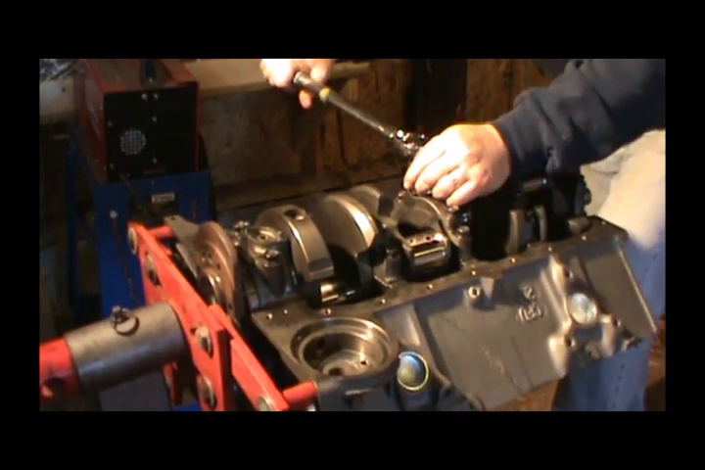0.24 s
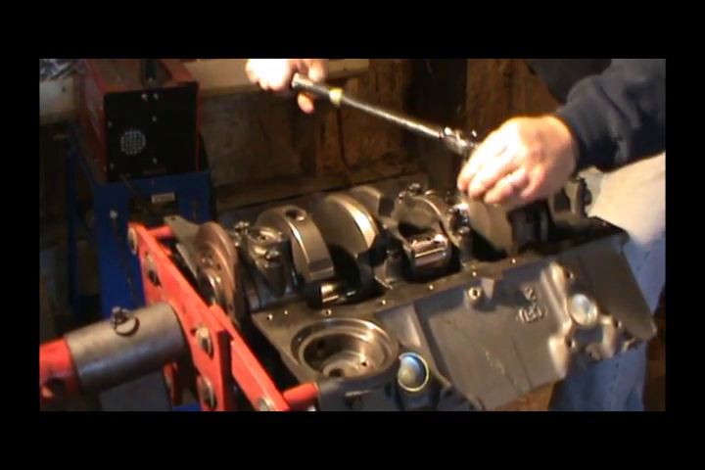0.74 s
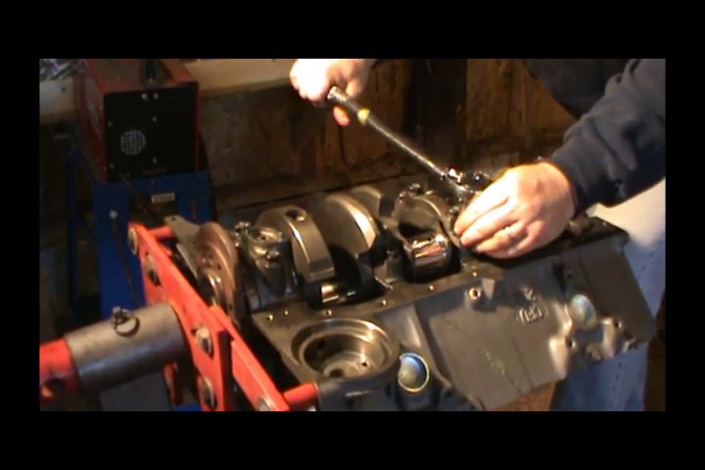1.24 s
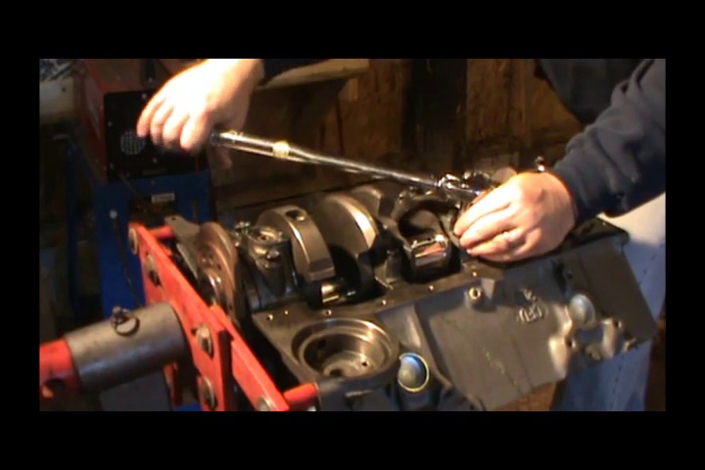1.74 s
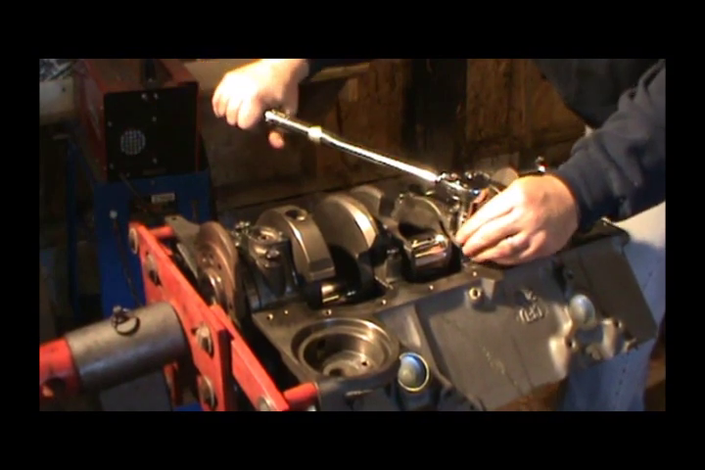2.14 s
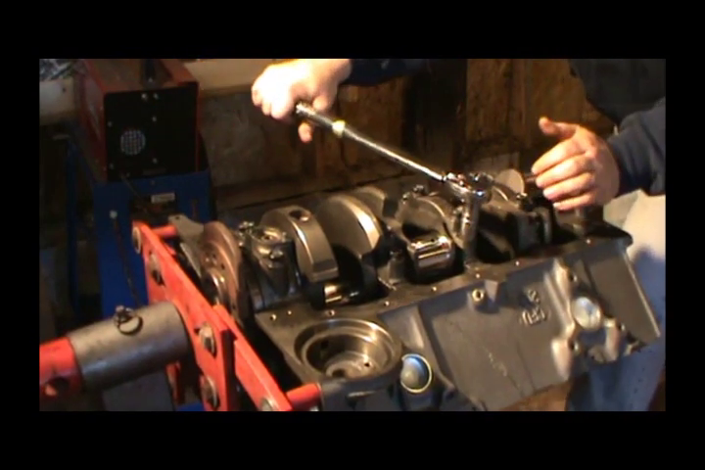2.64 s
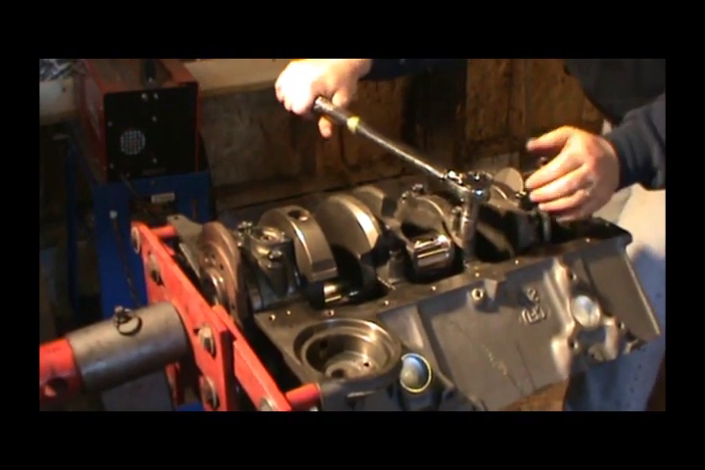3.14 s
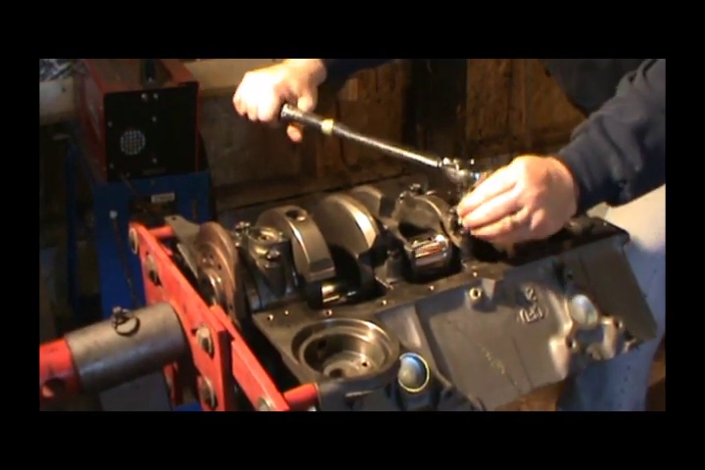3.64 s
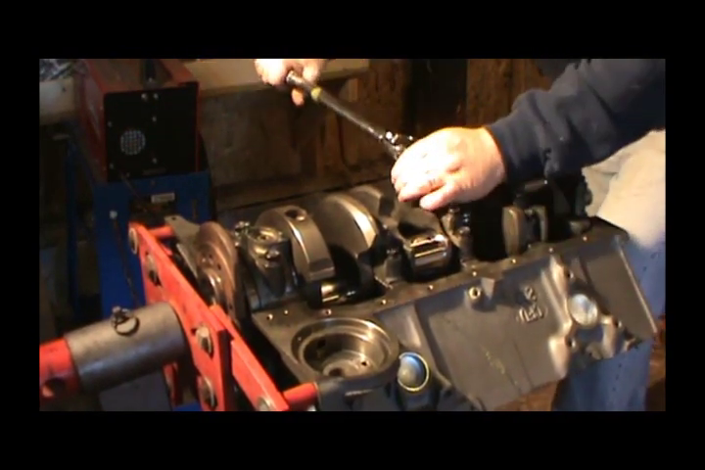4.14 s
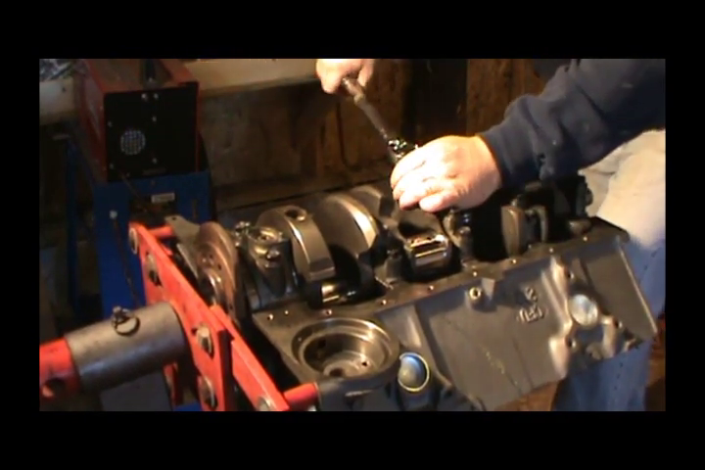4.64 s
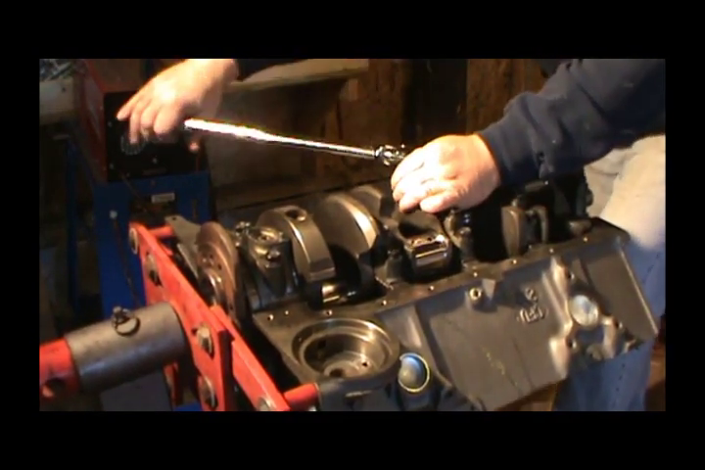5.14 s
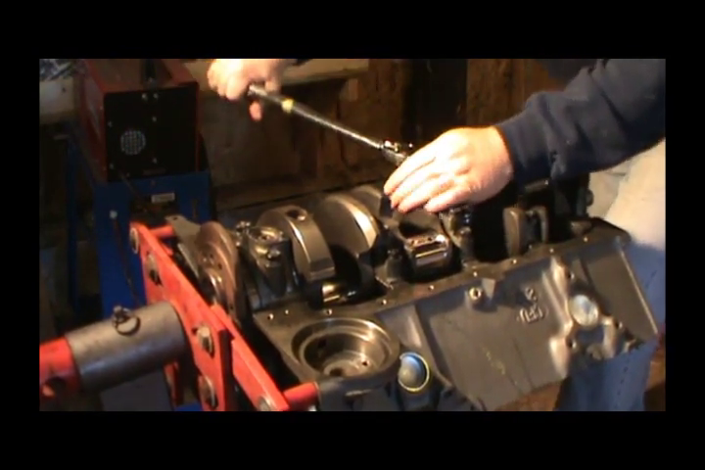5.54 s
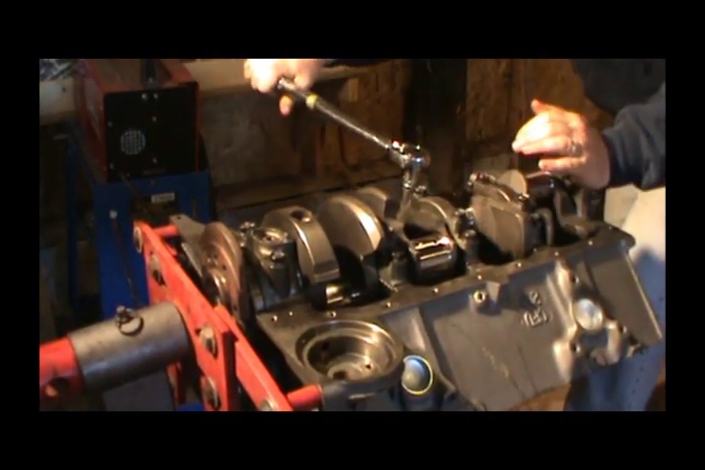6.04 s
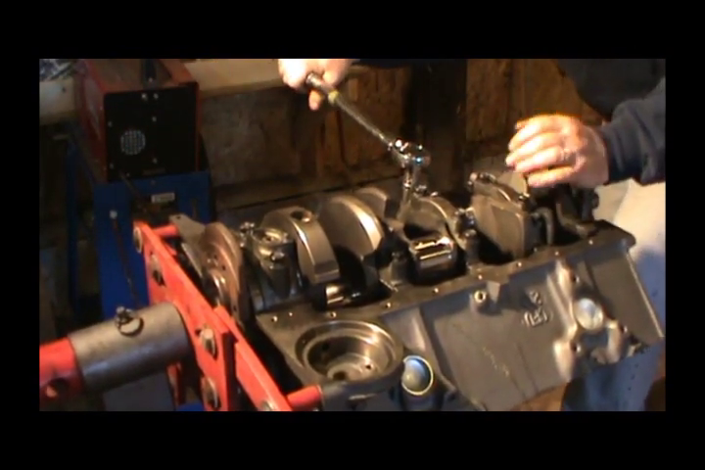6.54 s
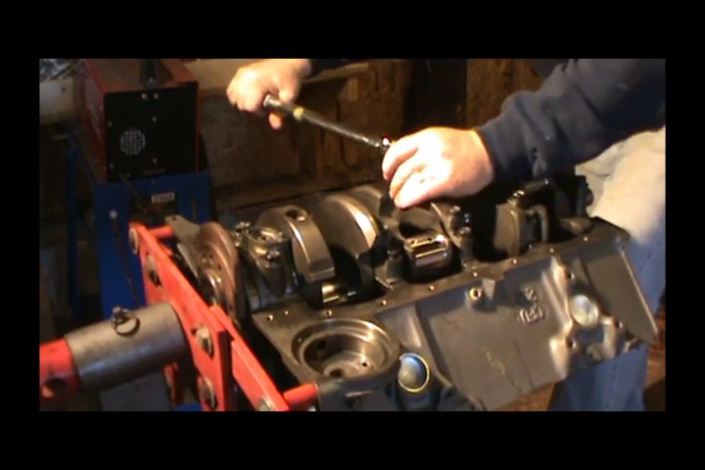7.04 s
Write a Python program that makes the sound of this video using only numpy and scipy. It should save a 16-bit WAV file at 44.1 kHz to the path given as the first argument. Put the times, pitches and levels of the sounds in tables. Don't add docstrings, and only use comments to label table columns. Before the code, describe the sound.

A quiet garage with soft low hush, heard close in stereo. At 0.04 s a loud, bright wrench click rings and echoes for about half a second, over grainy hand rubbing. Small dull bumps lead to a socket clack at 1.05, with rattles until 1.3. Two crisp ratchet ticks come at 1.61 and 1.70, then faint knocks around 2 to 2.5. A heavy torque click breaks at 2.84, strongly echoed, and its bright reset snaps at 3.18. Quiet handling follows; the socket lands hard at 4.17, with rubbing and a double knock near 4.63. Three quick double-edged ratchet ticks fall at 4.95, 5.03 and 5.11. Light bumps and rustle continue until a loud click at 6.32 and ringing reset at 6.63. Small knocks, a scuff and a rattle close near 7.1. Faint lens motor ticking surfaces around 1.1, 2.1, 2.9 and 5.7.

```python
import sys
import numpy as np
from scipy import signal
from scipy.fft import rfft, irfft
from scipy.io import wavfile
from scipy.ndimage import uniform_filter1d

SR = 44100
rng = np.random.default_rng(int(sys.argv[2]) if len(sys.argv) > 2 else 0)


def gain_from_decibels(decibels):
    exponent = np.asarray(decibels, float) / 20
    return 10 ** exponent


def file_out(sig):
    cols = np.atleast_2d(sig).T
    lim = np.clip(cols, -1, 1)
    pcm = np.round(lim * 32767).astype(np.int16)
    wavfile.write(sys.argv[1], SR, pcm)


N = 321048
SPAN = 16384

# frequency in Hz, level in dB.
HUSH_COLOUR = [(12, -49), (20, -7.5), (102, -4.5), (134, -6.5), (173, -7), (211, -9), (390, -9.5),
               (449, -10.5), (488, -11.5), (702, -13), (831, -13), (1130, -16), (1870, -17.5),
               (2550, -18.5), (16200, -29.5)]
HUSH_DB = -55.5
# frequency in Hz, likeness from 0 to 1.
HUSH_LIKENESS = [(60, 1.0), (130, 0.99), (290, 0.899), (640, 0.476), (1410, 0.04), (3100, 0.087),
                 (6820, 0.091), (15000, 0.47)]

# start in seconds, length in seconds, level in dB.
RUB = [
    (0, 0.554, -56.5),
    (1.25, 0.68, -56),
    (2.2, 0.13, -75.5),
    (2.49, 0.047, -56.5),
    (3.4, 0.332, -60.5),
    (4.33, 0.36, -57),
    (5.2, 0.416, -56.5),
    (5.7, 0.78, -65),
    (6.8, 0.11, -94),
    (7.08, 0.014, -50),
]
# frequency in Hz, level in dB per Hz.
RUB_COLOUR = [(300, -33.5), (700, -5.5), (1500, 1), (3000, -1.5), (5000, -7), (9000, -16.5), (15000, -14.5)]

# start in seconds, peak in dB, treble in dB against the peak,
# pan in dB (positive is left). The tables of the other blows of steel have the same columns.
RESETS = [
    (0.0418, -6.5, -13.5, -0.11),
    (3.1777, -5.5, -11, -1.14),
    (6.628, -6, -9.5, -0.021),
]
# frequency in Hz, level in dB per Hz.
RESET_COLOUR = [(100, -37.5), (350, -18), (900, -13), (2350, -3), (2750, -6.5), (3800, 3), (5200, -4.5),
                (5800, 0), (6600, -6), (7500, 2.5), (8600, -11), (10300, -5), (11800, -17.5),
                (15600, -21.5)]
# frequency in Hz, level in dB under the blow, seconds to fall by 60 dB.
RESET_MODES = [(953.5, -26, 0.156), (1381.8, -21.5, 0.189), (2317, -26, 0.433), (4610, -22.5, 0.272),
               (5420, -42.5, 0.18), (5739, -26.5, 0.3), (7400, -17, 0.211), (8043, -28.5, 0.17),
               (15505, -26.5, 0.262)]

# start in seconds, peak in dB, treble in dB against the peak, # body frequency in Hz.
KNOCKS = [(0.502, -45.5, -12.5, 2100), (0.8808, -53, -15.5, 1107), (1.504, -46, -15.5, 1270),
          (1.9323, -37, -13, 1104), (2.0403, -46, -14, 1340), (2.0744, -51.5, -14, 2360),
          (2.4138, -35.5, -33.5, 1750), (2.481, -44.5, -10.5, 2030), (3.8056, -49, -31.5, 2160),
          (3.8226, -50.5, -17, 2420), (3.9698, -51.5, -8.5, 4330), (4.0665, -44, -18.5, 3630),
          (4.6225, -25, -20.5, 3460), (4.6321, -22, -12, 1350), (4.841, -45.5, -22, 1950),
          (5.3622, -43, -19.5, 3870), (5.5384, -51, -19.5, 2940), (5.5996, -41.5, -21.5, 2120),
          (5.659, -42, -23, 2830), (5.7816, -47, -14, 2090), (5.9768, -61, -24, 1920),
          (6.9084, -45.5, -25, 1590), (6.9598, -48, -19, 1960), (7.0965, -36.5, -13.5, 3490),
          (1.1712, -27, -19.5, 3300), (4.6073, -36, -11.5, 3290), (7.083, -36, -24, 3300),
          (5.3351, -37, -21.5, 3280), (5.4694, -42, -14, 3280), (5.5746, -44, -5.5, 3300)]
# frequency in Hz, level in dB per Hz.
KNOCK_COLOUR = [(200, -48.5), (500, -6.5), (1500, -1), (3300, -1.5), (5000, -4.5), (8000, -11),
                (14000, -28.5)]
KNOCK_BODY_DB, KNOCK_BODY_OCTAVES, KNOCK_PAN_DB = 10, 0.25, -4.5

# start in seconds, peak in dB, treble in dB against the peak, pan in dB.
SEATS = [
    (1.0482, -37, -15, -21.5),
    (1.053, -19, -17.5, -4),
    (4.173, -9.5, -14.5, -5.5),
]
# frequency in Hz, level in dB per Hz.
SEAT_COLOUR = [(120, -55), (200, -36), (933, -12), (1140, -18), (1370, -8.5), (1620, -12.5), (1940, -7),
               (2250, -9.5), (3430, -4), (4270, -8), (7140, -11.5), (12800, -18.5), (16000, -37)]
# frequency in Hz, level in dB under the blow, seconds to fall by 60 dB.
SEAT_MODES = [(920, -11, .07), (1373, -8, .21), (15510, -30, .1), (2020, -24, .05), (3350, -28, .08),
              (4600, -26, .08), (5200, -28, .08)]

# start in seconds, length in seconds, tick level in dB.
LENS = [
    (1.1, 0.51, -52),
    (2.13, 0.5, -46.5),
    (2.9, 0.81, -47),
    (5.72, .6, -46),
    (6.6, .7, -72),
]
# frequency in Hz, seconds to fall by 60 dB, level in dB.
LENS_MODES = [(1920, 0.0482, -5), (4744, 0.0194, 1.5)]

# start in seconds, peak in dB, treble in dB against the peak, pan in dB.
RATTLES = [
    (1.1602, -29, -17.5, -6),
    (1.2024, -31.5, -28.5, -4.5),
    (1.2838, -44.5, -22.5, -13),
    (3.5268, -54, -20, -8.5),
    (3.5757, -51, -28, -8.5),
    (3.5927, -47.5, -28.5, -9.5),
    (4.2922, -33.5, -34, -6),
    (5.4554, -47, -17, -16),
    (7.0576, -40.5, -15.5, -11),
]
# frequency in Hz, level in dB per Hz.
RATTLE_COLOUR = [(180, -47), (300, -20), (787, -15.5), (955, -7.5), (2130, -15), (3290, -5), (3870, -8),
                 (7720, -28), (14000, -40.5)]
# frequency in Hz, level in dB under the blow, seconds to fall by 60 dB.
RATTLE_MODES = [(3320, -9, .06), (3370, -13, .05), (7600, -24, .05)]

# start in seconds, peak in dB, treble in dB against the peak, pan in dB.
PAWL = [
    (1.6092, -9.5, -10, -1.2),
    (1.702, -10, -7, 1.03),
    (4.9432, -25.5, -5, 0.0),
    (4.9468, -12, -9.5, -1.25),
    (5.0222, -21, -8, -1.0),
    (5.0273, -10.5, -7, -0.19),
    (5.1039, -23, -7.5, -1.0),
    (5.111, -10.5, -10, -2),
]
# frequency in Hz, level in dB per Hz.
PAWL_COLOUR = [(250, -43.5), (900, -23.5), (1800, -16.5), (2450, -9.5), (2750, -10.5), (3700, -4),
               (4700, -4), (5400, -3.5), (6500, -13), (7600, -4.5), (10200, -4), (13400, -9), (14500, -24),
               (15600, -21.5)]
# frequency in Hz, level in dB under the blow, seconds to fall by 60 dB.
PAWL_MODES = [(1373, -33, 0.295), (2432, -24.5, 0.081), (3256, -18, 0.13), (15510, -26.5, .08),
              (3620, -18, 0.036), (4360, -15.5, 0.076), (5550, -37.5, 0.053), (7570, -26.5, 0.087),
              (8450, -37.5, 0.033), (10100, -47, 0.048)]

# start in seconds, peak in dB, treble in dB against the peak,
# pan in dB.
BREAKS = [
    (2.8449, -7.5, -12, -8.5),
    (6.3197, -42.5, -31.5, 0.5),
    (6.325, -6, -10, -2),
]
# frequency in Hz, level in dB per Hz.
BREAK_COLOUR = [(120, -48), (300, -18.5), (800, -17), (2700, -8.5), (3100, -4), (3700, -5), (4250, 3),
                (4950, -15), (5800, -1), (6500, -7), (11200, -9.5), (12000, -22.5), (13500, -14.5),
                (15000, -24)]
# frequency in Hz, level in dB under the blow, seconds to fall by 60 dB.
BREAK_MODES = [(140, -37, .5), (813, -40, .15), (1373, -23, .28), (3036, -26, .1), (4240, -24, .05),
               (5850, -30, .04), (15510, -29, .15)]

# frequency in Hz, seconds to fall by 60 dB.
GARAGE_T60 = [(120, 0.774), (320, 0.627), (840, 0.538), (2210, 0.4505), (5820, 0.3417), (15400, 0.1778)]
# frequency in Hz, likeness from 0 to 1.
ECHO_LIKENESS = [(60, 0.75), (130, 0.91), (290, 1), (640, 0.87), (1410, 0.455), (3100, 0.379),
                 (6820, 0.397), (15000, 0.77)]
RING_ECHO_DB = -7


def at_hz(points, hz):
    table_hz, values = np.array(points).T
    return np.interp(np.log(hz + 1), np.log(table_hz), values)


def rms_one(x):
    return x / np.sqrt(np.mean(x ** 2) + 1e-20)


def dying(size, t60):
    return gain_from_decibels(-60 * np.arange(size) / SR / t60)


def causal(db):
    cepstrum = irfft(db * np.log(10) / 20)
    cepstrum[1:len(db) - 1] *= 2
    cepstrum[len(db):] = 0
    return np.exp(rfft(cepstrum))


def spells(rows, t, rise_db, fall_db):
    gain = 0
    for start, length, db in rows:
        early = np.maximum(start - t, 0)
        late = np.maximum(t - start - length, 0)
        gain = gain + gain_from_decibels(db - rise_db * early - fall_db * late)
    return gain


def stereo_noise(size, colour, likeness):
    hz = np.fft.rfftfreq(size, 1 / SR)
    mid, side = rfft(rng.standard_normal((2, size)))
    alike = np.clip(at_hz(likeness, hz), 0, 1)
    both = np.sqrt(1 + alike) * mid + np.sqrt(1 - alike) * side * [[1], [-1]]
    return rms_one(irfft(both * gain_from_decibels(at_hz(colour, hz)), size))


def ringing(modes, ring_db, spread_db):
    t = np.arange(SPAN) / SR
    rings = np.zeros(SPAN)
    for hz, db, t60 in modes:
        level_db = db + ring_db + spread_db * rng.standard_normal()
        rings += gain_from_decibels(level_db) * np.sin(2 * np.pi * hz * t) * dying(SPAN, t60)
    return rings


def blows(events, colour, modes, snap, chatter_s, spread_db, echo_db, ring_db=0):
    hz = np.fft.rfftfreq(SPAN, 1 / SR)
    out = np.zeros((3, N + SPAN))
    usual_db = np.median(np.array(events)[:, 2])
    for start, peak_db, treble_db, last in events:
        tilt = 0.5 * (treble_db - usual_db)
        shape = at_hz(colour, hz) + tilt * np.log2((hz + 50) / 4000)
        pan_db = last
        if not modes:
            octaves = np.log2((hz + 1) / last)
            shape += KNOCK_BODY_DB * np.exp(-(octaves / KNOCK_BODY_OCTAVES) ** 2)
            pan_db = KNOCK_PAN_DB
        body = causal(shape)
        chatter = rng.laplace(size=SPAN) * dying(SPAN, chatter_s)
        chatter[0] = snap
        crack = irfft(rfft(chatter) * body)
        crack /= np.sqrt(np.max(uniform_filter1d(crack ** 2, size=40)) * 2)
        even = rms_one(irfft(body)) * np.std(crack)
        rings = ringing(modes, ring_db, spread_db)
        to_walls = even + rings * gain_from_decibels(RING_ECHO_DB - echo_db)
        gains = gain_from_decibels(peak_db + np.array([[pan_db / 2], [-pan_db / 2], [echo_db]]))
        i = round(start * SR)
        out[:, i:i + SPAN] += gains * np.array([crack + rings, crack + rings, to_walls])
    return out[:, :N]


def room_hush():
    return gain_from_decibels(HUSH_DB) * stereo_noise(N, HUSH_COLOUR, HUSH_LIKENESS)


def rubbing(grain_db=2.2):
    grains = gain_from_decibels(grain_db * rms_one(uniform_filter1d(rng.standard_normal(N), size=300)))
    strokes = spells(RUB, np.arange(N) / SR, rise_db=169.5, fall_db=121.5)
    return strokes * rms_one(grains * stereo_noise(N, RUB_COLOUR, ECHO_LIKENESS))


def detent_resets():
    return blows(RESETS, RESET_COLOUR, RESET_MODES, snap=6.19, chatter_s=0.0282, spread_db=-2.0,
                 echo_db=6.5, ring_db=-0.28)


def dull_knocks():
    return blows(KNOCKS, KNOCK_COLOUR, [], snap=8.65, chatter_s=0.0966, spread_db=0, echo_db=-5)


def socket_seats():
    return blows(SEATS, SEAT_COLOUR, SEAT_MODES, snap=4.5, chatter_s=0.05, spread_db=1,
                 echo_db=-3, ring_db=-5.5)


def lens_motor(uneven_db=2.2):
    steps = np.arange(0.003, N / SR, 1 / 29.97)
    effort = spells(LENS, steps, rise_db=60, fall_db=60)
    t = np.arange(SPAN // 4) / SR
    soft_start = 1 - np.exp(-t / 0.00754)
    out = np.zeros(N)
    for hz, t60, db in LENS_MODES:
        clicks = np.zeros(N)
        luck_db = uneven_db * rng.standard_normal(len(steps))
        clicks[(steps * SR).astype(int)] = effort * gain_from_decibels(db + luck_db)
        ring = np.sin(2 * np.pi * hz * t) * dying(len(t), t60) * soft_start
        out += signal.fftconvolve(clicks, ring)[:N]
    return out * gain_from_decibels([[-1.5], [1.5]])


def socket_rattles():
    return blows(RATTLES, RATTLE_COLOUR, RATTLE_MODES, snap=3.0, chatter_s=0.03, spread_db=1.5,
                 echo_db=-4.5, ring_db=2)


def pawl_ticks():
    return blows(PAWL, PAWL_COLOUR, PAWL_MODES, snap=3.5, chatter_s=0.036, spread_db=2.5,
                 echo_db=-5.5, ring_db=-6)


def detent_breaks():
    return blows(BREAKS, BREAK_COLOUR, BREAK_MODES, snap=5.87, chatter_s=0.02206, spread_db=0.5,
                 echo_db=10.0, ring_db=-0.35)


def garage(feed, gap_s=0.0039, spiky=0.258):
    size = 2 * SPAN
    noise = stereo_noise(size, [(20, 0.0041), (20000, 0.014)], ECHO_LIKENESS)
    noise *= np.exp(spiky * rng.standard_normal(size) * dying(size, 3.2))
    hz, t, frames = signal.stft(noise, SR, nperseg=256)
    frames *= gain_from_decibels(-60 * t / at_hz(GARAGE_T60, hz)[:, None])
    tail = signal.istft(frames, SR, nperseg=256)[1][:, :size]
    tail *= 1 - np.exp(-(np.arange(size) / SR / gap_s) ** 2)
    tail /= np.sqrt(np.sum(tail ** 2) / 2)
    return signal.fftconvolve(feed[None], tail, axes=1)[:, :N]


def close_ports(pair, top=0.549):
    rounded = top * np.tanh(pair / top)
    pair = signal.sosfilt(signal.butter(2, 112, "high", fs=SR, output="sos"), rounded)
    mid, side = (pair[0] + pair[1]) / 2, (pair[0] - pair[1]) / 2
    side = signal.lfilter(*signal.butter(1, 350, "high", fs=SR), side)
    late_right = signal.lfilter([0.25, 0.75], [1], mid - side)
    return np.array([mid + side, late_right])


def scene():
    steel = detent_resets() + dull_knocks() + socket_seats()
    steel += socket_rattles() + pawl_ticks() + detent_breaks()
    heard = close_ports(steel[:2] + garage(steel[2]) + rubbing())
    return heard + room_hush() + lens_motor()


def camera_treble(x, mask_db=-47, side_db=-12, top_db=-30):
    hz, _, frames = signal.stft([x[0] + x[1], x[0] - x[1]], SR, nperseg=512)
    power = np.abs(frames[0]) ** 2
    luck = uniform_filter1d(rng.standard_normal(power.shape), size=4, axis=0)
    luck = rms_one(uniform_filter1d(luck, size=8, axis=1))
    band = uniform_filter1d(uniform_filter1d(power, size=4, axis=0), size=6, axis=1)
    masked = band < gain_from_decibels(2 * mask_db + 7 * luck) * power.sum(axis=0)
    frames[:, masked & (hz[:, None] > 11300)] = 0
    frames[1, hz > 9800] *= gain_from_decibels(side_db)
    frames[:, hz > 15850] *= gain_from_decibels(top_db)
    mid, side = signal.istft(frames, SR, nperseg=512)[1][:, :N] / 2
    return np.array([mid + side, mid - side])


def top_cut(x):
    return signal.sosfilt(signal.butter(12, 16970, fs=SR, output="sos"), x)


def record(dry):
    mix = camera_treble(dry)
    return top_cut(mix)


dry = scene()
out = record(dry)
file_out(out)
```